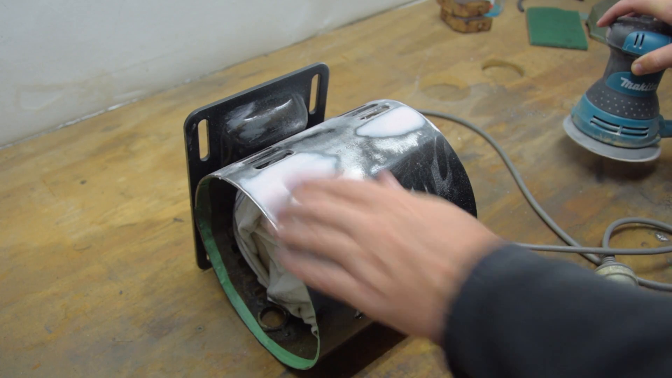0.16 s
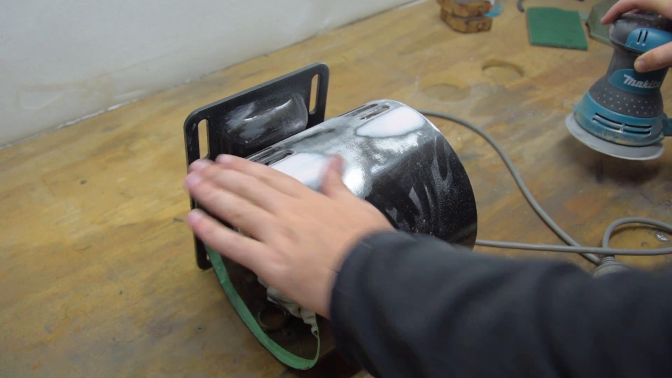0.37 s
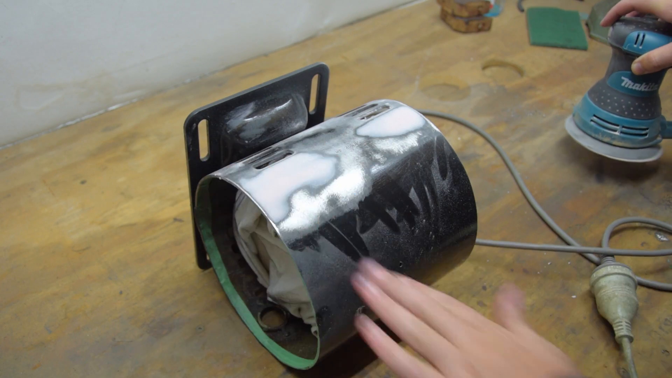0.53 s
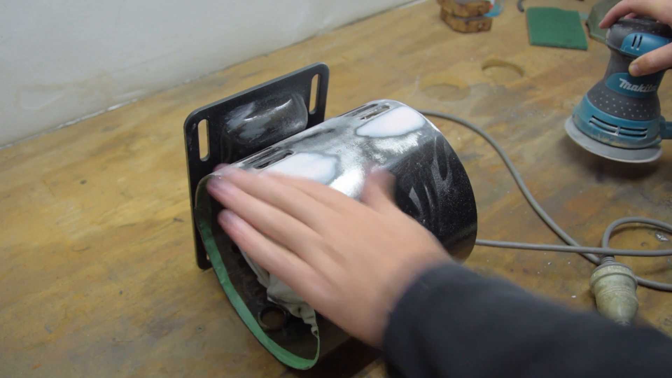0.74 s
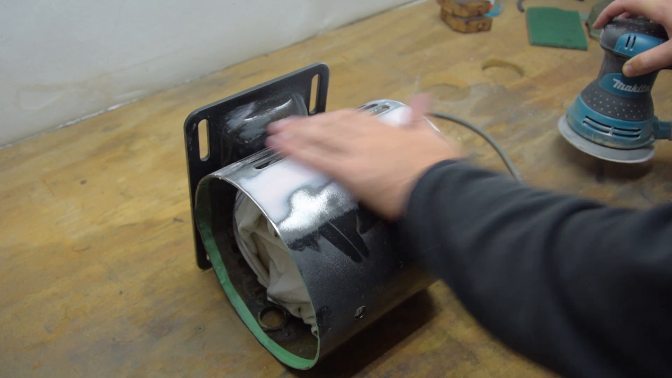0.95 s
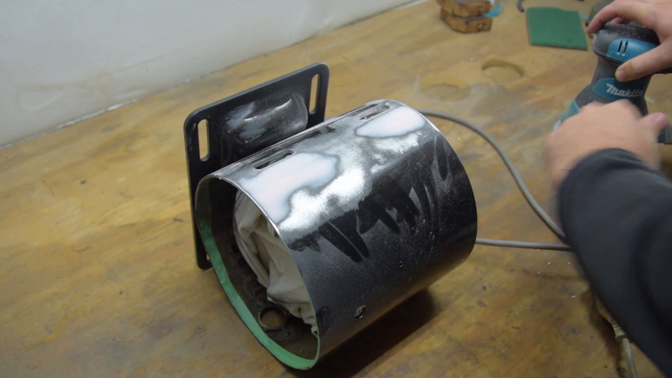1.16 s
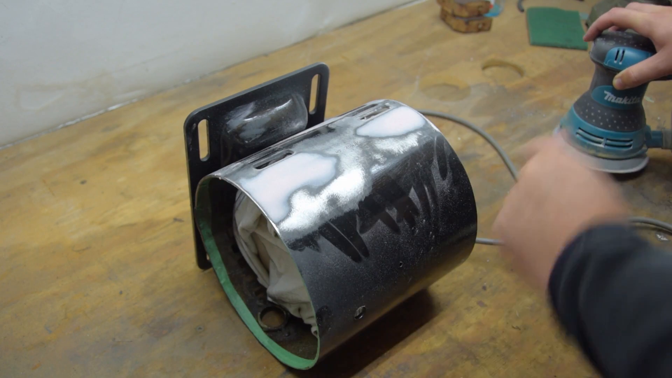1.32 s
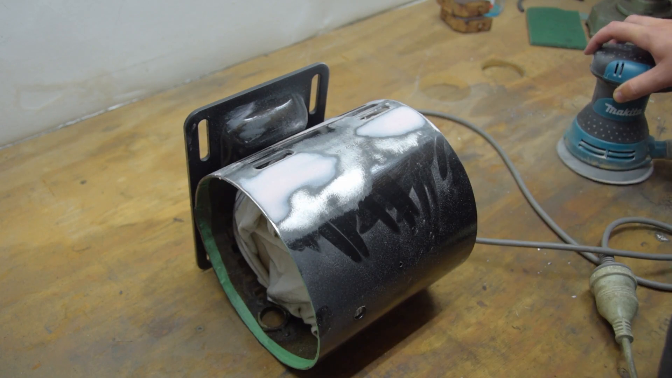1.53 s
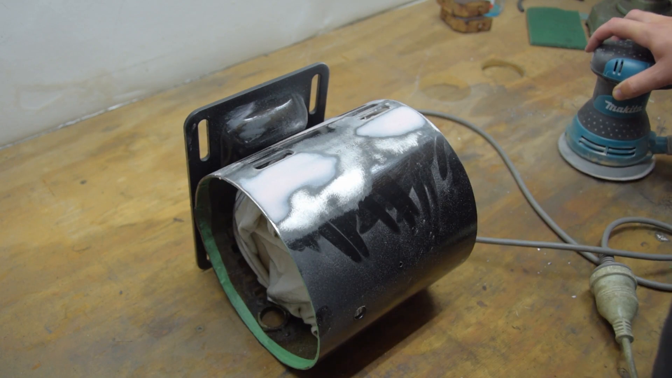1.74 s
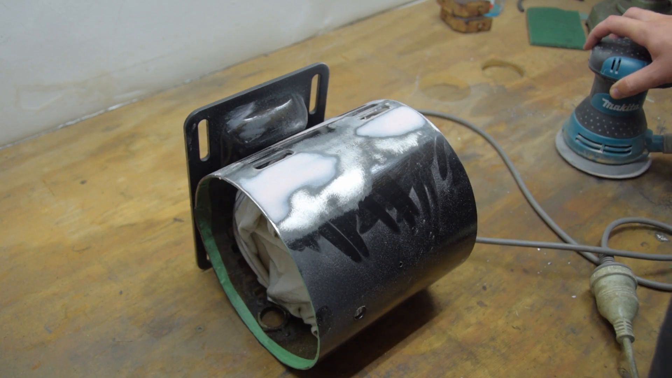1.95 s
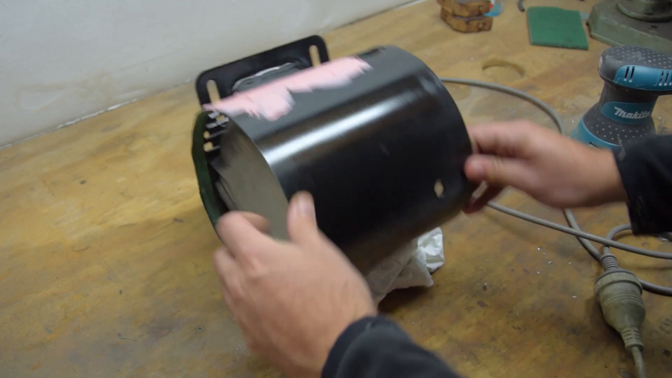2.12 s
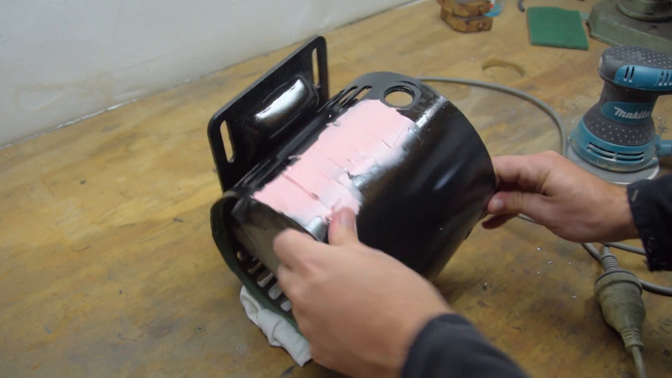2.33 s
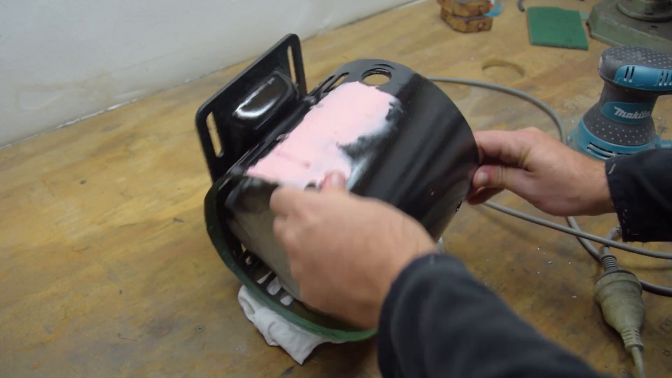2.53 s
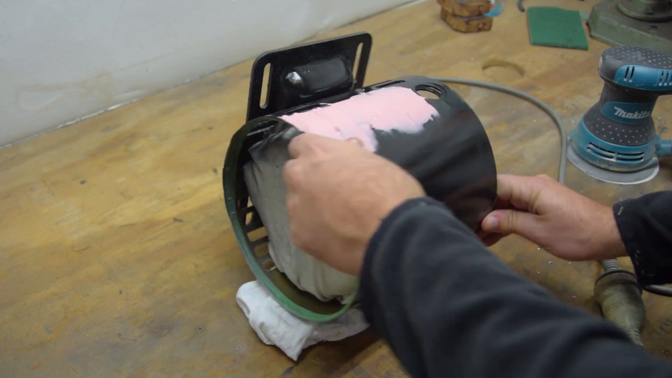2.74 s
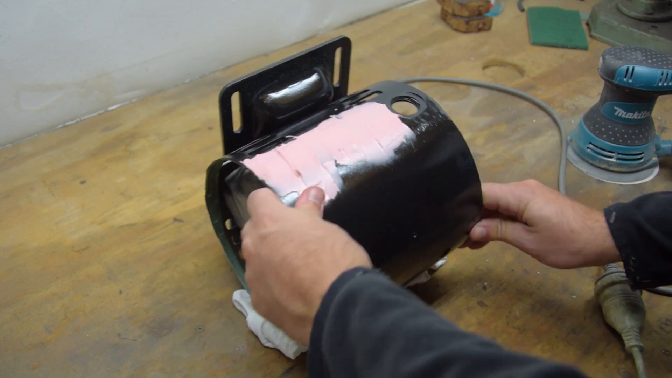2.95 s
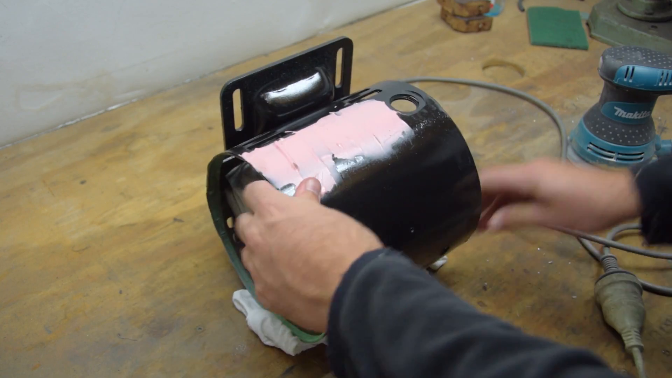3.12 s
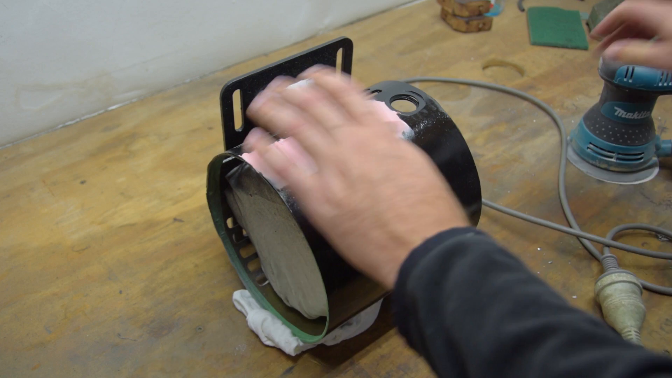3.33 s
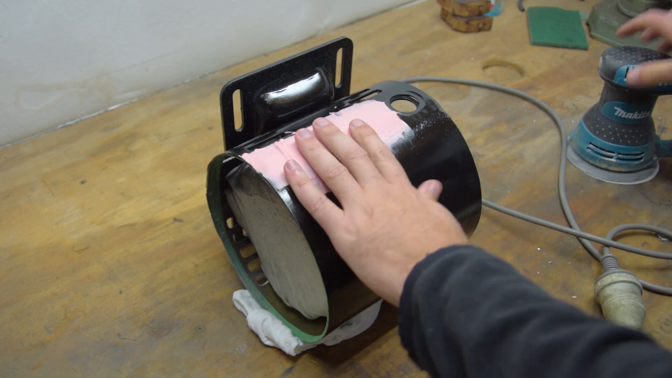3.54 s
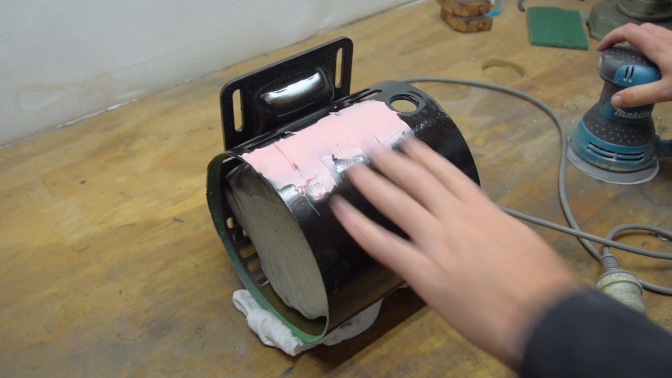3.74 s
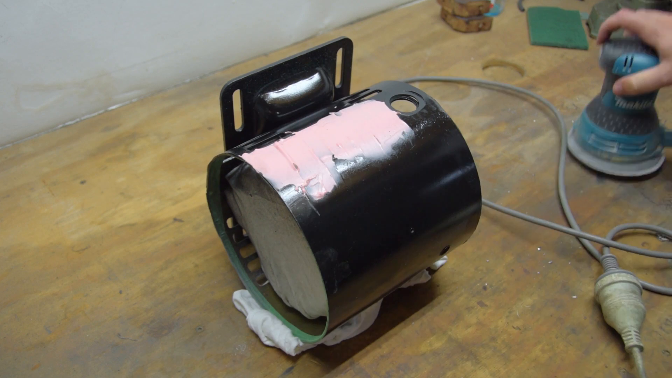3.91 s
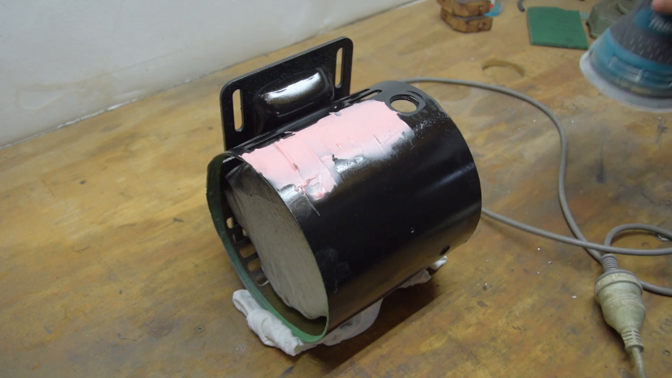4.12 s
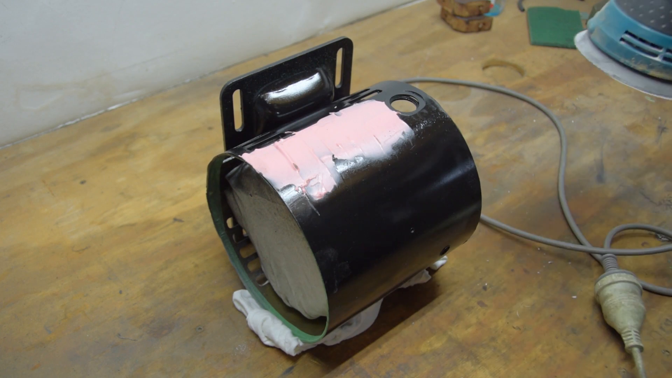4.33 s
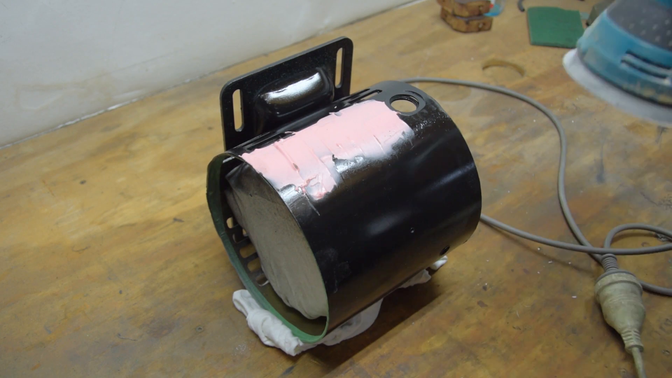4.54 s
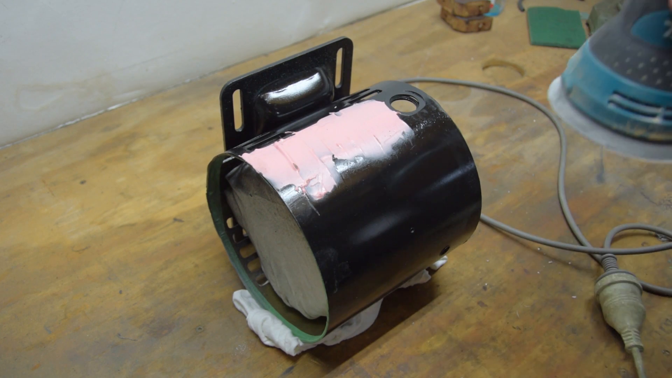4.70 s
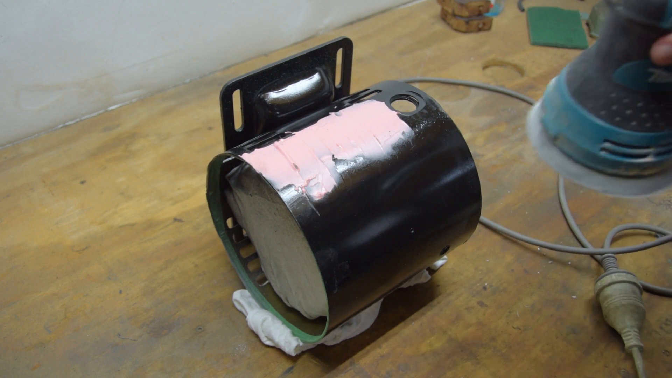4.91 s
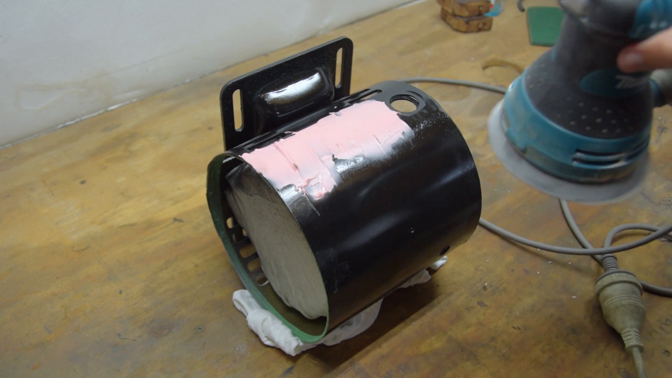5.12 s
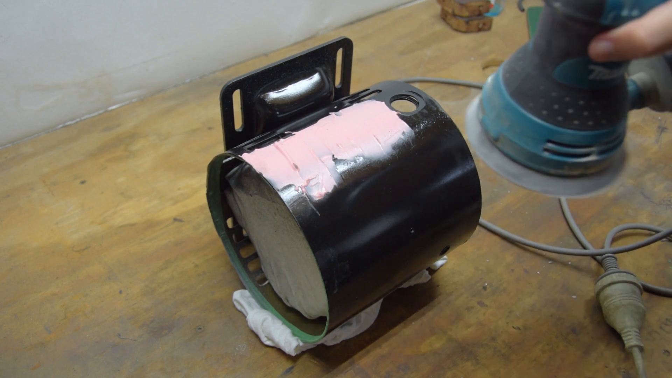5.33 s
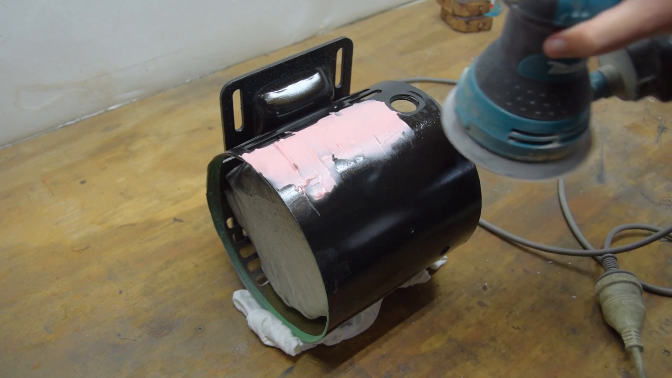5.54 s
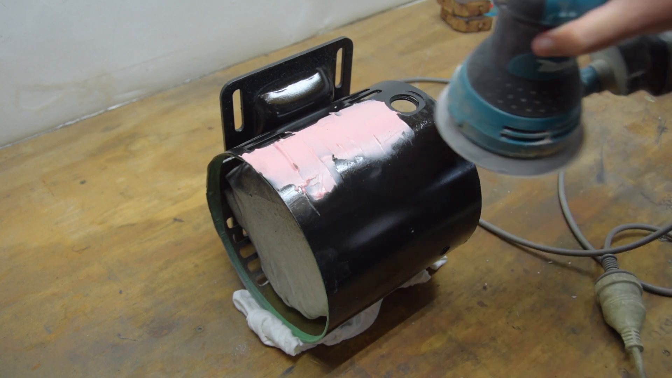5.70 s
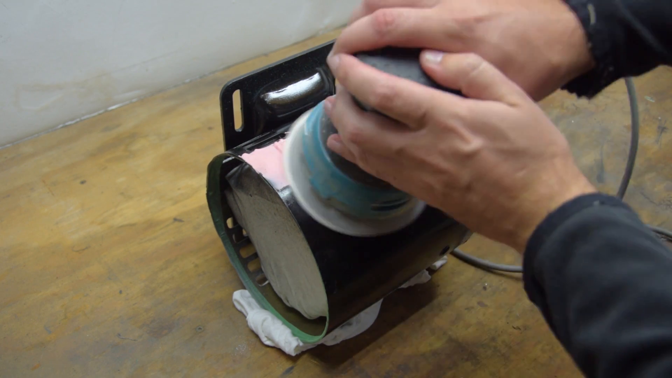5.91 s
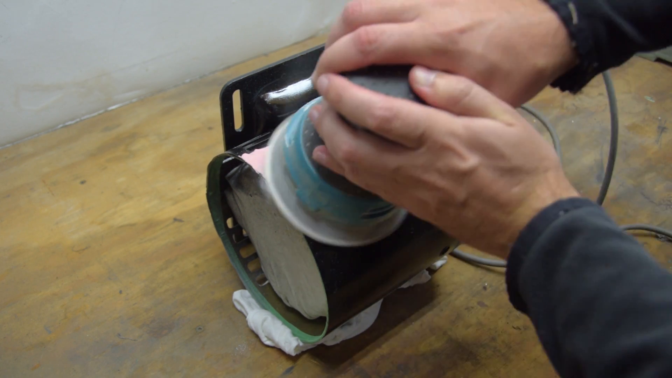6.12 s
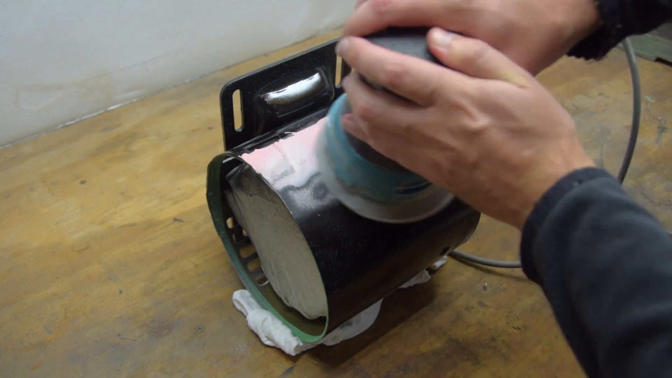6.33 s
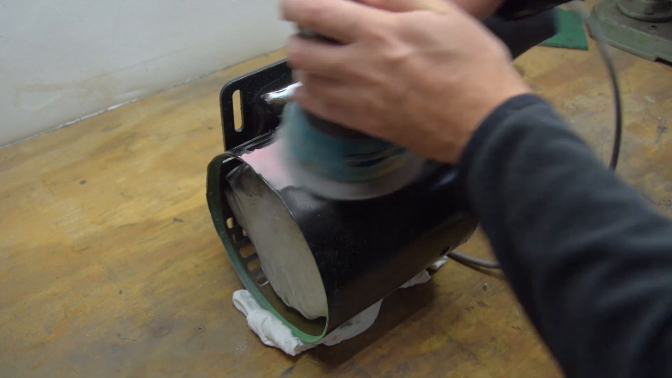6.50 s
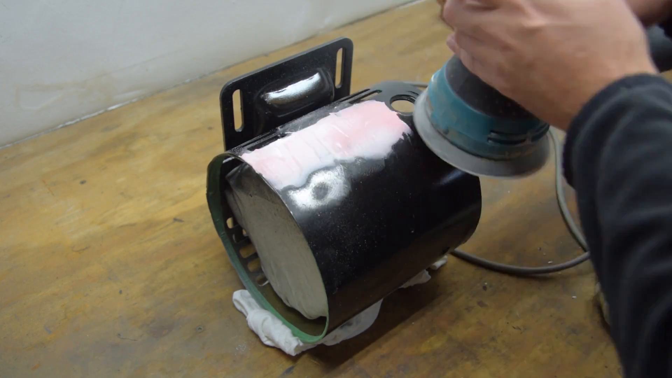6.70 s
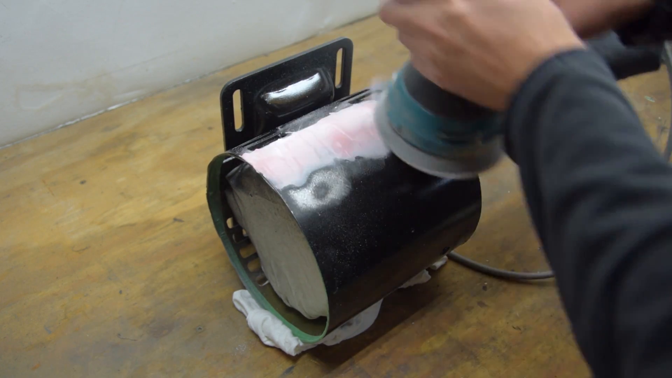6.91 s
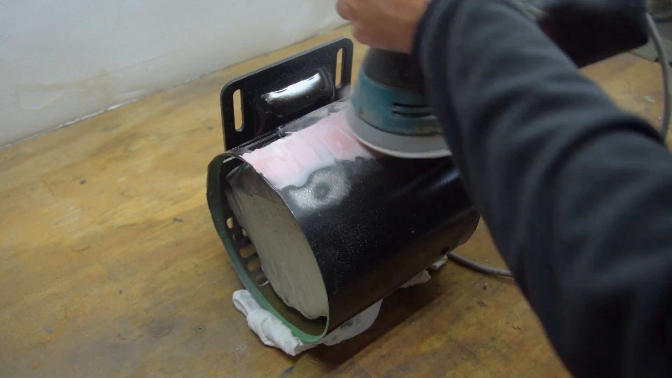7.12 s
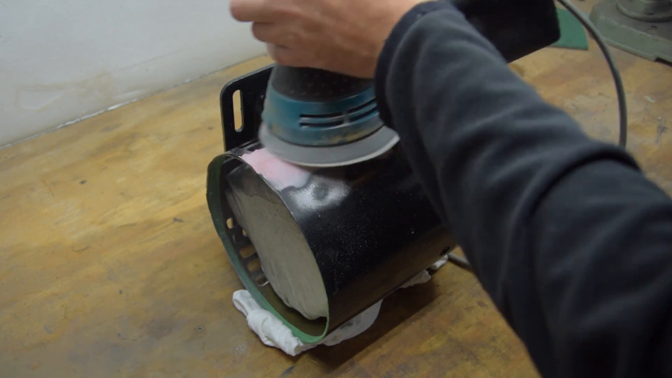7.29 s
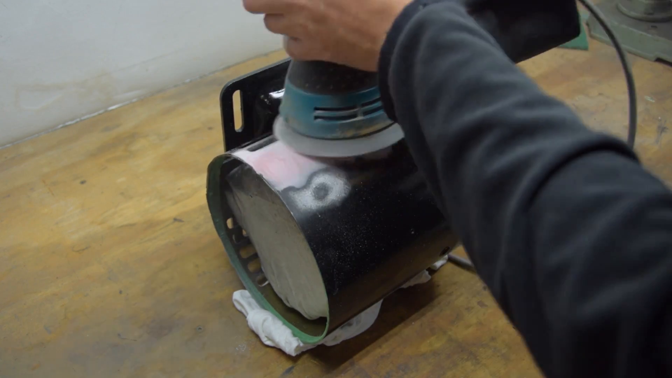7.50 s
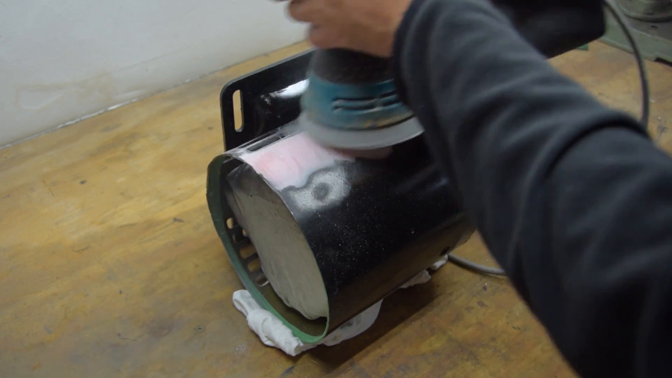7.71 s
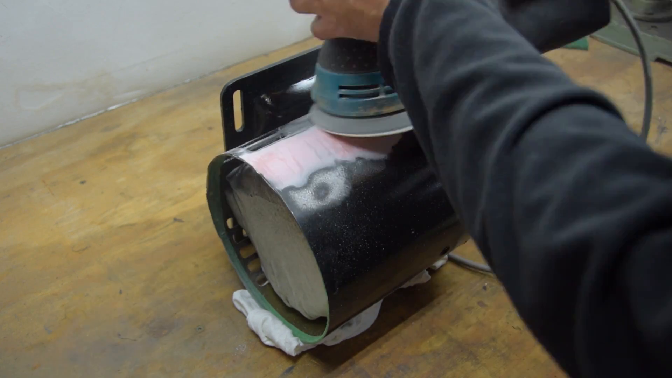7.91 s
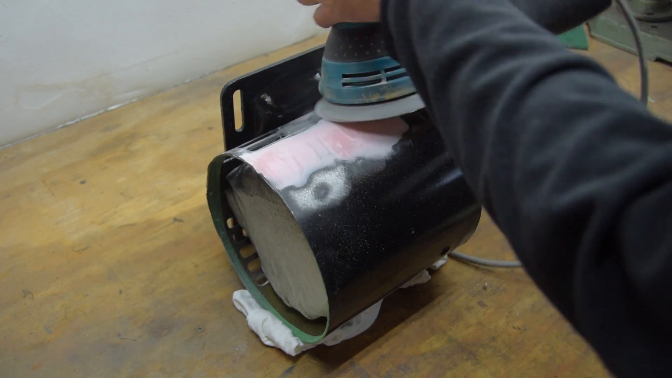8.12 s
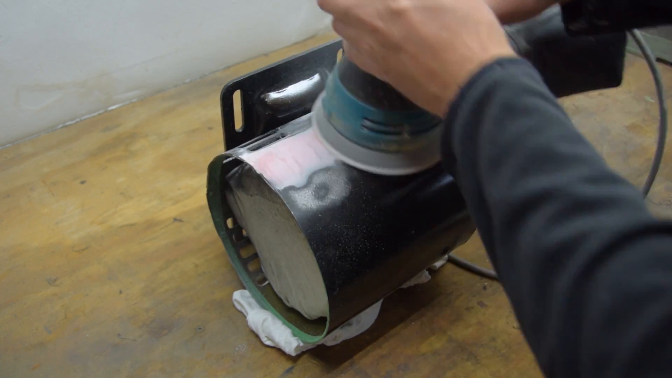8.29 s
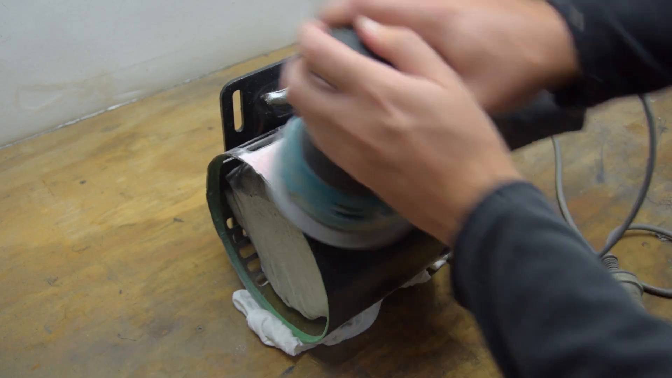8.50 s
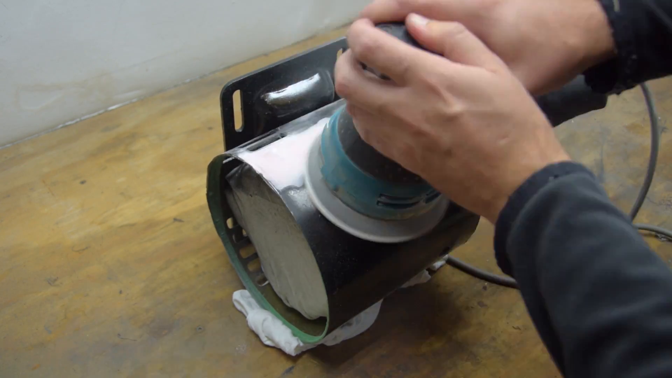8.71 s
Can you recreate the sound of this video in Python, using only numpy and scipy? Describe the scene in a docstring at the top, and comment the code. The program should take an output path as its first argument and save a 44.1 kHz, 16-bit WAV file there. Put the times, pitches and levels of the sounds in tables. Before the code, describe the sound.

From 0 to 2.2 s an orbital sander winds down close by: low thrum sliding from about 165 to 50 Hz, with a fading whine and airy rush. Soft hand wipes brush steel around 0.4, 1.1, 1.6 and 2.15 s. The motor sound ends abruptly. A steel housing then thuds on a wooden bench at about 2.37, 2.46, 2.66, 2.94 and 3.13 s, the 2.66 knock strongest, with hollow short rings, faint ticks and a light rim scrape. Quiet room tone with tiny taps and rubbing follows. A sharp plastic clack comes at 4.07 s. At 4.84 s a switch ticks and the motor rises quickly to a bright whir near 200 turns per second. Two dry clicks near 5.8 s mark pad contact; thereafter steady, loud sanding continues to the end, buzzing and hissing with wavering pitch, whine surges, brief rasps near 6.8 and 7.25 s, and a rapid fluttering echo.

```python
"""Sander and steel housing at a workshop bench

Close by in a small workshop, direct sound over room: an orbital sander coasts down while a hand wipes dust
off a sheet-steel housing on a wooden bench. The housing is rocked and set down, and the sander clacks as it
is picked up, spins up and sands filler. Shaft-locked sines make the pad's thrum, the casing's buzz and the
fan's whine; coloured noise makes air, grit and wiping; struck modes make the housing ring."""
import sys
import numpy as np
from scipy import signal
from scipy.fft import rfft, irfft, next_fast_len
from scipy.io import wavfile

SR = 44100
rng = np.random.default_rng(int(sys.argv[2]) if len(sys.argv) > 2 else 0)


def log_audio(samples):
    """Write samples as a 16-bit WAV file to the path given in sys.argv[1]."""
    # one column per channel
    frames = np.atleast_2d(samples).T
    # limit to full scale, then quantise
    limited = np.clip(frames, -1, 1)
    pcm = np.round(limited * 32767).astype(np.int16)
    wavfile.write(sys.argv[1], SR, pcm)


N = 385875
TIME = np.arange(N) / SR

# --- shaft of the sander ---
# the coasting sound ends abruptly; later the motor is switched on again
COAST_END_S, SWITCH_ON_S = 2.19, 4.84
# switched off, the shaft is slowed by air drag (time constant) and by steady friction
COAST_FROM_HZ, DRAG_S, FRICTION_HZ_PER_S = 165.7, 2.258, 17.3
# switched on, it closes in on its free speed until the pad touches the filler
SPIN_UP_FROM_S, FREE_HZ, SPIN_UP_S, TOUCH_S = 4.8115, 214.0, 0.3266, 5.78
# usual shaft speed while sanding
WORKING_HZ = 200
# shaft speed under the hand's changing load: (time [s], speed [turns/s])
SANDING_SPEED = [(5.77, 202.6), (5.83, 207.6), (5.93, 203.8), (6.07, 202.3), (6.26, 203.8), (6.34, 207.2),
                 (6.68, 200.4), (6.745, 200.4), (6.785, 209), (6.83, 209.2), (6.885, 201.5), (6.93, 199),
                 (6.98, 201.6), (7.06, 198.3), (7.14, 196.8), (7.2, 199.5), (7.265, 207), (7.325, 199.3),
                 (7.37, 196.9), (7.5, 197.8), (7.64, 199.6), (7.73, 203), (7.82, 204.1), (7.89, 199.3),
                 (7.97, 201), (8.17, 207.2), (8.27, 207.6), (8.32, 200.5), (8.45, 194.8), (8.58, 199.1),
                 (8.75, 199.5)]
# trembling of the shaft speed, as a share of it, which frays the high tones; under power more while slow
TREMBLE, DRIVEN_TREMBLE = 0.004, 0.004
# the thrum's phase jumps back abruptly: its time and the jump in turns
JUMP_S, JUMP_TURNS = 5.7735, 0.6
# the level dips briefly there: depth and time constant of the recovery
DIP_DB, DIP_S = 8, 0.0085

# --- layers of the sander: base level at working speed [dB], change per doubling of speed [dB] ---
THRUM_DB, THRUM_PER_OCTAVE_DB = -42, 21.5
BUZZ_DB, BUZZ_PER_OCTAVE_DB = -54, 9
FAN_HISS_DB, FAN_HISS_PER_OCTAVE_DB = -55, 11
# air builds more steeply under power than it fades when coasting
AIR_DB, AIR_PER_OCTAVE_DB, DRIVEN_AIR_PER_OCTAVE_DB = -39, 8.5, 10.5
# whine fades with the coasting shaft, but under power it weakens as the speed grows
WHINE_DB, WHINE_PER_OCTAVE_DB, DRIVEN_WHINE_PER_OCTAVE_DB = -52.5, 5.5, -4.5
# the thrum is louder while the sander coasts, hovering just over the bench
NEAR_BENCH_DB = 8.5
# standing waves swallow the thrum at some pitches:
# (pitch [Hz], width [Hz], loss by the bench [dB], loss when lifted [dB])
NODES = [(114, 7, 8, 2), (141, 7, 13, 11), (163, 9, 5, 11), (183, 10, 0, 7)]
# how firmly the pad couples to the housing; the first value holds before: (time [s], gain [dB])
PRESSURE = [(5.77, 3.5), (5.83, 6.5), (6.05, 6), (6.28, 4), (6.7, 9), (7.4, 9.5), (7.95, 8.5), (8.3, 9),
            (8.74, 9)]
# buzz gained and air choked off, in dB for each dB of pressure
BUZZ_FOLLOWS, AIR_CHOKES = 0.15, 0.31
# hum at twice the shaft speed: (time [s], level [dB])
SECOND_HUM = [(0, -57), (.6, -63.5), (2.19, -85.5), (4.9, -98), (5.15, -56.5), (5.33, -66), (5.47, -58),
              (5.85, -52), (6.2, -63), (6.4, -52), (6.55, -59.5), (7.05, -52.5), (7.5, -48), (7.78, -57.5),
              (7.92, -55), (8.23, -65), (8.35, -49.5), (8.75, -51)]
# hum at three times the shaft speed: (time [s], level [dB])
THIRD_HUM = [(0, -50), (.6, -66), (2.19, -75), (4.9, -73.5), (5.27, -58), (5.6, -60), (5.9, -58.5),
             (6.35, -69), (6.55, -58.5), (6.92, -52.5), (7.35, -57.5), (7.55, -54), (8.15, -51.5),
             (8.75, -51)]
# the casing's buzz: (multiple of the shaft speed, relative level [dB])
BUZZ = [(4, -10), (6, -9.5), (7, -9.5), (12, -12.5), (17, -11), (20, -22), (30, -46), (35, -16)]
# colour of the rushing air: (frequency [Hz], level [dB])
AIR = [(40, -38), (150, -13), (300, -10), (800, -4), (1100, 0), (1500, -0.5), (1900, 0.5), (2600, 3.5),
       (3400, 5), (4000, -3.5), (5500, -4.5), (7500, -10), (10000, -17.5), (15000, -51)]
# colour of the grit and the fan's hiss: (frequency [Hz], level [dB])
GRIT = [(100, -1), (330, 10.5), (1000, 3), (3000, 4), (4500, 9.5), (6000, -6), (7300, 6.5), (8500, 6.5),
        (10000, 6.5), (12500, 5.5), (15500, -0.5)]
# grit on the filler: its level, and the time it takes to bite
GRIT_DB, GRIT_BITE_S = -53, 0.13
# the paper loses its grip: (time [s], length [s], loss [dB])
SKIPS = [(6.753, 0.052, 22)]
# a narrow ring of the casing, stirred by noise and by any buzz that meets its pitch; build time at switch-on
SING_HZ, SING_T60_S, SING_DB, SING_BUZZ_DB, SING_BUILD_S = 1790, 0.28, -65, -5, 0.14
# the ring comes forward: (time [s], length [s], gain [dB])
SING_SWELLS = [(7.52, 0.34, 10)]

# --- whine ---
# counts of fan blades and armature slots
BLADES, SLOTS = 18, 12
# tone of the fan blades, then the 2nd to 11th multiple of the armature slots:
# (coasting level [dB], driven level [dB], clock time when fully in [s])
WHINE = [(-6, -4, 5.22), (7, 3.5, 5.08), (-4, -17, 4.3), (-4.5, -4, 5.14), (-7, -19, 5.2), (-5.5, -27, 4.6),
         (-8.5, -27, 5.9), (-7, -38, 6.1), (-12, -46, 5.2), (-11, -48, 5.2), (-19, -45, 5.2)]
# how fast each tone comes in as the motor picks up
WHINE_BUILD_DB_PER_S = 130
# slow wavering of each tone, and its fast flicker running free and under load
WHINE_WAVER_DB, FREE_FLICKER_DB, LOAD_FLICKER_DB = 3.0, 2.5, 3.6
# swing of the whine's amplitude once a turn, as a share of it, which gives it sidebands
WHINE_SWING = 0.42
# pass band of the vents: (frequency [Hz], level [dB])
VENTS = [(400, -39), (1250, -20), (1600, -8.5), (1850, -16), (2250, 1), (3000, 1), (4000, 0.5),
         (4900, -2.5), (5600, -4.5), (6600, -6.5), (7400, -4.5), (8400, -9), (10000, -14), (12000, -16),
         (14000, -21), (15500, -25)]
# the vents turn to face the listener or away; slot tones only: (time [s], length [s], gain [dB])
WHINE_SWELLS = [(5.17, 0.2, 2), (5.6, .16, 4), (5.87, .08, 5), (6.05, 0.25, 7), (6.23, .06, -7),
                (6.69, 0.1, 12), (6.83, .06, 4), (6.95, .07, -3), (7.07, .06, 4), (7.27, 0.07, 5.5),
                (7.5, .08, 3.5), (7.6, 0.08, -5), (7.82, 0.09, 6), (7.97, .06, 4), (8.37, .07, -6),
                (8.53, .05, -5)]
# single tones stand out or sink: (time [s], length [s], multiple of the shaft speed, gain [dB])
TONE_SWELLS = [(.36, .12, 48, 5), (.68, .36, 48, 8), (1.2, .18, 48, 5), (1.87, .3, 48, 5),
               (1.36, .22, 36, 4), (1.75, .16, 60, 4), (.51, .1, 60, 5), (1.02, .24, 60, 7),
               (1.38, .14, 60, 3), (2.02, .2, 60, 4), (.57, .14, 72, 5), (1.39, .14, 72, 4),
               (2.08, .25, 72, 4), (1.46, .16, 96, 4), (1.72, .22, 108, 13), (1.2, .16, 24, -6),
               (.2, .5, 84, -7), (.1, .3, 72, -7), (.1, .3, 60, -5), (.15, .2, 48, -4), (5.42, .3, 18, 5),
               (5.85, .08, 18, 9), (6.25, .4, 18, 10), (6.8, .07, 18, 10), (7.62, .25, 18, -12)]

# --- hands, housing and bench ---
# hands and sleeves brushing: (time [s], length [s], palm rumble [dB], skin swish [dB])
WIPES = [(0.393, .06, -58, -61.5), (1.109, 0.023, -70, -48.5), (1.612, 0.14, -57.5, -56.5),
         (2.164, 0.031, -60, -55.5), (2.312, 0.62, -73, -77.5), (3.69, 0.99, -75, -81),
         (3.907, 0.12, -70.5, -77.5)]
# colour of a palm rubbing the housing: (frequency [Hz], level [dB])
PALM = [(50, -7), (130, -8.5), (300, -9.5), (700, -16), (2000, -27.5), (8000, -48.5)]
# colour of skin sliding on dust: (frequency [Hz], level [dB])
SKIN = [(800, -1.5), (3000, 9.5), (8000, -1), (15000, -4)]
# bumps on the bench: (time [s], thud [dB], thud pitch [Hz], push on the modes [dB],
# contact cut-off [Hz], crack [dB])
BUMPS = [(2.367, -23, 86.7, -30.5, 160, -56.5), (2.46, -15.5, 110, -29, 353, -30),
         (2.6567, -12, 135, -16.5, 1050, -18.5), (2.9447, -15.5, 126, -14, 1570, -17),
         (3.128, -21, 121, -29, 690, -27.5), (3.481, -48, 109, -58.5, 1173, -52),
         (3.642, -66, 118, -58.5, 393, -71), (4.067, -36.5, 122, -59, 491, -73.5)]
# modes of housing and bench top: (pitch [Hz], relative level [dB], t60 [s])
HOUSING = [(66.4, -3, 0.24), (85, -4, 0.33), (107, -8, 0.85), (119.4, -14.5, 0.38), (156.4, 2.5, 0.26),
           (214, -22.5, 0.47), (269.5, 5.5, 0.076), (285, -0.5, 0.14), (371, -18.5, 0.18),
           (419, -14.5, 0.23), (490, -2.5, 0.079), (553, -16.5, 0.31), (700, -11.5, 0.11),
           (765, -18.5, 0.067), (915, -24.5, 0.25), (1033, -19.5, .17), (1215, -22, .22),
           (1260, -10.5, 0.057), (1534, -32, 0.15), (1750, -27.5, .22), (2019, -35.5, .3), (2820, -32, .25),
           (3200, -34.5, .35), (3450, -32.5, .25)]
# colour of the steel rim hitting the bench: (frequency [Hz], level [dB])
CRACK = [(30, -14.5), (80, -2), (200, 17.5), (330, 9.5), (480, 2.5), (800, -1.5), (1200, -7), (2000, -12),
         (3100, -8), (4200, -21.5), (6000, -25.5), (15000, -28)]
# fingers tap the housing and wake one mode: (time [s], pitch [Hz], level [dB], t60 [s])
TAPS = [(2.324, 1260, -60, 0.035), (3.323, 915, -61, 0.041), (3.48, 1050, -56, 0.063)]
# small ticks of fingers, rim and switch: (time [s], level [dB], t60 [s])
TICKS = [(2.372, -65, 0.037), (2.48, -63, .02), (2.688, -54, 0.058), (2.787, -63, 0.074),
         (3.192, -48.5, 0.0084), (3.323, -70, 0.016), (3.481, -60.5, 0.04), (3.604, -62, 0.033),
         (3.638, -64, 0.047), (4.835, -56.5, 0.03), (4.862, -61.5, 0.02)]
# colour of the ticks: (frequency [Hz], level [dB])
TICK = [(300, -6.5), (1000, -5.5), (3000, 5.5), (7000, -1.5), (11000, -4.5), (15500, -21)]
# the rim slides over the bench between two bumps: (time [s], length [s], level [dB])
SLIDES = [(3.073, 0.25, -66)]
# colour of the sliding rim: (frequency [Hz], level [dB])
RIM = [(500, 0.5), (2800, -9), (3600, -1), (4300, -18), (5800, -11), (7000, -18), (8000, -12),
       (15000, -26.5)]
# plastic clacks of the sander: (time [s], level [dB], t60 [s], contact cut-off [Hz])
CLACKS = [(4.025, -45, 0.028, 4500), (4.043, -50, .04, 2500), (4.0648, -41, 0.013, 3500),
          (4.0688, -24.5, 0.018, 14000), (4.078, -42, .06, 14000)]
# colour of the plastic body and pad knocking on the bench: (frequency [Hz], level [dB])
CLACK = [(50, -39), (110, 4), (330, 6.5), (750, -4.5), (1150, 3), (1800, 2), (2500, 4), (3150, 7.5),
         (4000, 0), (5500, -11.5), (7000, -16), (10000, -33), (15000, -42)]
# the plastic shell rings briefly: (pitch [Hz], level against the contact's click [dB], t60 [s])
SHELL = [(1193, -11, .02), (2586, -10, 0.008), (3000, -6, 0.024), (3300, -16, .009)]
# level of the room's answer to a clack
CLACK_ROOM_DB = -8.5

# --- dry clicks and the flutter ---
# dry clicks as the flutter sets in: (time [s], level before colour [dB], brightness [dB per octave])
POPS = [(5.7735, -13, 7), (5.8162, -6.5, 0)]
# colour of the dry clicks: (frequency [Hz], level [dB])
POP = [(100, -10), (800, -14), (1300, 7.5), (4000, 4.5), (7000, -4.5), (15000, -16)]
# pitch about which a click's brightness pivots
POP_PIVOT_HZ = 5000
# while sanding, the sound repeats in a fast fading flutter: start, repeat time, share of the whine repeated
FLUTTER_S, FLUTTER_LAG_S, WHINE_FLUTTER = 5.775, 0.042667, 0.24
# the pad skids and rasps: (time [s], length [s], level [dB])
RASPS = [(6.813, 0.09, -42), (7.26, 0.087, -47)]
# colour of the rasp: (frequency [Hz], level [dB])
RASP = [(200, -45), (1500, -18), (2700, -4), (3300, -3), (3800, -4), (4300, -12), (8000, -26)]

# --- place and microphone ---
# decay of the workshop: (frequency [Hz], t60 [s])
ROOM_T60 = [(60, .4), (250, 0.53), (1000, 0.53), (3000, 0.47), (6000, 0.37), (14000, 0.12)]
# colour of the quiet workshop: (frequency [Hz], level [dB])
QUIET = [(38, -31), (65, -3), (158, -4.5), (335, -3.5), (450, -8.5), (565, -2), (912, -19), (1610, -14),
         (2370, -18.5), (3500, -17), (4400, -22.5), (15000, -23)]
QUIET_DB = -78
# colour of the faint hiss, opposite in the two channels: (frequency [Hz], level [dB])
HISS = [(100, -2), (1000, -1), (5000, -1), (10000, 0.42), (15000, -2)]
HISS_DB = -90.5
# a faint steady electrical whistle at the very top
WHISTLE_HZ, WHISTLE_DB = 15633, -86.5
# full spread of the sander between left and right: (frequency [Hz], side against mid [dB])
WIDTH = [(100, -11), (200, -65), (400, -9.5), (600, -14.5), (1000, -13.5), (2200, -25), (4500, -17),
         (8000, -8), (13000, -4)]
# the spread opens slowly from the flutter's start: time to full width, starting width
WIDEN_S, NARROW_DB = 1.54, -21
# top of the microphone's range
CUTOFF_HZ = 15850


def from_db(db):
    """Decibels to gain."""
    return 10 ** (np.asarray(db) / 20)


def rms_one(x):
    """Scale to rms 1."""
    return x / np.sqrt(np.mean(x ** 2) + 1e-20)


def in_time(rows):
    """Each column of a curve, sample by sample."""
    s, *columns = np.transpose(rows)
    return np.array([np.interp(TIME, s, c) for c in columns])


def at_hz(points, hz):
    """Read a spectrum on a log-frequency axis."""
    f, value = np.transpose(points)
    return np.interp(np.log(hz + 1e-9), np.log(f), value)


def colour(x, spectrum):
    """Shape a signal by a spectrum."""
    gain = from_db(at_hz(spectrum, np.fft.rfftfreq(len(x), 1 / SR)))
    return irfft(rfft(x) * gain, len(x))


def noise(spectrum):
    """Coloured noise of rms 1."""
    white = rng.standard_normal(next_fast_len(N))
    return rms_one(colour(white, spectrum)[:N])


def drift(rate):
    """Smooth random wander, about 1 in spread, with a new target rate times a second."""
    return np.interp(TIME * np.clip(rate, 0, 400), np.arange(4000), rng.standard_normal(4000))


def swell(s, length):
    """A smooth rise and fall around s."""
    return np.exp(-(2 * (TIME - s) / length) ** 2)


def swells(table):
    """Sum of smooth rises and falls, in dB."""
    return sum(db * swell(s, length) for s, length, db in table)


def swell_gain(table):
    """Sum of smooth rises and falls out of silence, as gain."""
    return sum(from_db(db) * swell(s, length) for s, length, db in table)


def fade(s, t60):
    """An envelope that starts at s and dies away."""
    return (TIME >= s) * from_db(-60 * np.clip((TIME - s) / t60, 0, 4))


def fade_energy(t60):
    """Energy of a fade from height 1, in samples."""
    return t60 * SR / (2 * np.log(1000))


def click(s, db):
    """One sample of the given height at time s."""
    return from_db(db) * signal.unit_impulse(N, int(s * SR))


def ring(force, hz, t60):
    """A mode: a unit click sets a sine of height 1 ringing."""
    r, w = from_db(-60 / (t60 * SR)), 2 * np.pi * hz / SR
    return signal.lfilter([0, np.sin(w)], [1, -2 * r * np.cos(w), r * r], force + 1e-18)


def soften(x, hz):
    """A soft contact loses the treble above hz."""
    return signal.sosfilt(signal.butter(2, min(hz, CUTOFF_HZ), fs=SR, output="sos"), x + 1e-18)


def workshop(x, gap_s=0.011):
    """Diffuse echoes of unit energy after a short gap; the top treble dies first."""
    t, tail = TIME[:SR], 0
    edges = np.geomspace(40, 17000, 10)
    for low, high in zip(edges, edges[1:]):
        band_filter = signal.butter(2, [low, high], "band", fs=SR, output="sos")
        band = signal.sosfilt(band_filter, rng.standard_normal(SR))
        t60 = at_hz(ROOM_T60, np.sqrt(low * high))
        tail = tail + band * 1000 ** (-t / t60) * (t > gap_s)
    return signal.fftconvolve(x, tail / np.linalg.norm(tail))[:N]


def shaft_speed():
    """Turns per second: coasting down under drag and friction, spinning up, then under load."""
    drag_offset = FRICTION_HZ_PER_S * DRAG_S
    coast = (COAST_FROM_HZ + drag_offset) * np.exp(-TIME / DRAG_S) - drag_offset
    since_start = np.maximum(TIME, SWITCH_ON_S) - SPIN_UP_FROM_S
    spin_up = FREE_HZ * (1 - np.exp(-since_start / SPIN_UP_S))
    return np.select([TIME < COAST_END_S, TIME < TOUCH_S], [coast, spin_up], in_time(SANDING_SPEED)[0])


def sander_levels(speed, coasting):
    """Levels in dB of thrum, buzz, whine, air and fan hiss, from shaft speed and pad pressure."""
    octaves = np.log2(speed / WORKING_HZ)
    pressure_db, = in_time(PRESSURE)
    nodes_db = sum(np.where(coasting, bench_db, lifted_db) * np.exp(-((speed - hz) / width) ** 2)
                   for hz, width, bench_db, lifted_db in NODES)
    thrum_db = THRUM_DB + THRUM_PER_OCTAVE_DB * octaves + NEAR_BENCH_DB * coasting - nodes_db + pressure_db
    buzz_db = BUZZ_DB + BUZZ_PER_OCTAVE_DB * octaves + BUZZ_FOLLOWS * pressure_db
    whine_db = WHINE_DB + np.where(coasting, WHINE_PER_OCTAVE_DB, DRIVEN_WHINE_PER_OCTAVE_DB) * octaves
    air_slope_db = np.where(coasting, AIR_PER_OCTAVE_DB, DRIVEN_AIR_PER_OCTAVE_DB)
    air_db = AIR_DB + air_slope_db * octaves - AIR_CHOKES * pressure_db
    hiss_db = FAN_HISS_DB + FAN_HISS_PER_OCTAVE_DB * octaves
    return thrum_db, buzz_db, whine_db, air_db, hiss_db


def partial(angle, multiple, waver_db):
    """A wavering tone of rms about 1, locked to the shaft."""
    phase = 2 * np.pi * rng.random()
    return from_db(waver_db * drift(25)) * np.sqrt(2) * np.sin(multiple * angle + phase)


def casing_buzz(angle):
    """The imbalance shakes the casing on every multiple of the turn from the 4th to the 35th."""
    return sum(from_db(at_hz(BUZZ, k)) * partial(angle, k, waver_db=4.5) for k in range(4, 36))


def whine(angle, speed, coasting):
    """Blade and slot tones glide through the vents' pass band and swing with each turn."""
    multiples = [BLADES] + [SLOTS * k for k in range(2, len(WHINE) + 1)]
    slots_db, tones = swells(WHINE_SWELLS), 0
    for k, (coast_db, driven_db, full_s) in zip(multiples, WHINE):
        own_db = swells([(s, length, db) for s, length, multiple, db in TONE_SWELLS if multiple == k])
        build_db = WHINE_BUILD_DB_PER_S * np.minimum(TIME - full_s, 0)
        flicker_db = np.where(TIME > TOUCH_S, LOAD_FLICKER_DB, FREE_FLICKER_DB) * drift(65)
        db = np.where(coasting, coast_db, driven_db + build_db) + flicker_db + own_db
        db = db + slots_db * (k != BLADES) + at_hz(VENTS, k * speed)
        audible = k * speed < CUTOFF_HZ
        tones = tones + from_db(db) * audible * partial(angle, k, waver_db=WHINE_WAVER_DB)
    return tones * (1 + WHINE_SWING * np.sin(angle) + 0.13 * np.sin(2 * angle))


def casing_ring(buzz, coasting):
    """A narrow resonance of the casing, driven by noise and by the buzz."""
    by_noise = rms_one(ring(rng.standard_normal(N), SING_HZ, SING_T60_S))
    # divided by the mode's gain for a steady tone at its pitch
    by_buzz = ring(buzz, SING_HZ, SING_T60_S) / fade_energy(SING_T60_S)
    sing = from_db(SING_DB) * by_noise + from_db(SING_BUZZ_DB) * by_buzz
    stirred = np.where(coasting, 1, np.clip((TIME - SWITCH_ON_S) / SING_BUILD_S, 0, 1))
    return from_db(swells(SING_SWELLS)) * stirred * sing


def rushing_air(angle, air_db):
    """Turbulent air, pulsing faintly once a turn and fluctuating at random."""
    return from_db(air_db + 0.092 * np.sin(angle) + 1.24 * drift(60)) * noise(AIR)


def grit_and_fan_hiss(angle, hiss_db):
    """Grains catch at random, hardest on one side of the orbit, over the hiss of the fan."""
    bite = np.clip((TIME - TOUCH_S) / GRIT_BITE_S, 0, 1) * from_db(GRIT_DB - swells(SKIPS))
    level = np.hypot(bite, from_db(hiss_db))
    return level * from_db(0.59 * np.sin(angle) + 2.3 * drift(300)) * noise(GRIT)


def sander():
    """Every tone follows the shaft; air and grit pulse once an orbit."""
    coasting, speed = TIME < COAST_END_S, shaft_speed()
    thrum_db, buzz_db, whine_db, air_db, hiss_db = sander_levels(speed, coasting)
    tremble = np.where(coasting, TREMBLE, DRIVEN_TREMBLE * np.sqrt(WORKING_HZ / speed)) * drift(120)
    angle = 2 * np.pi * np.cumsum(speed * (1 + tremble)) / SR
    # the eccentric pad pushes air once a turn, nearly a pure tone
    thrum_angle = angle - 2 * np.pi * JUMP_TURNS * (TIME > JUMP_S)
    thrum = from_db(thrum_db) * partial(thrum_angle, 1, waver_db=0.8)
    second = from_db(in_time(SECOND_HUM)[0]) * partial(angle, 2, waver_db=5.0)
    third = from_db(in_time(THIRD_HUM)[0]) * partial(angle, 3, waver_db=4.0)
    buzz = from_db(buzz_db) * casing_buzz(angle)
    fan_whine = from_db(whine_db) * whine(angle, speed, coasting)
    tones = buzz + fan_whine
    dip = from_db(-DIP_DB * (TIME > JUMP_S) * np.exp(-np.abs(TIME - JUMP_S) / DIP_S))
    noises = rushing_air(angle, air_db) + grit_and_fan_hiss(angle, hiss_db) + rasps(angle)
    room = from_db(-9.5) * workshop(tones)
    machine = dip * (noises + casing_ring(buzz, coasting) + tones + room) + pops()
    repeats = flutter(machine - (1 - WHINE_FLUTTER) * dip * fan_whine)
    running = coasting | (TIME > SWITCH_ON_S)
    return running * (dip * thrum + second + third + machine + repeats)


def wipes():
    """Skin and cloth slide over dusty steel in soft swells of noise."""
    palm = swell_gain([(s, length, palm_db) for s, length, palm_db, _ in WIPES])
    skin = swell_gain([(s, length, skin_db) for s, length, _, skin_db in WIPES])
    return from_db(1.8 * drift(120)) * (palm * noise(PALM) + skin * noise(SKIN))


def bumps(thud_t60=0.16, rise_t60=0.016, crack_t60=0.049, crack_reach=2.3):
    """The bench thuds under each bump; a harder contact reaches higher modes and cracks more brightly."""
    thud, force, cracks = np.zeros((3, N))
    for s, thud_db, thud_hz, ring_db, contact_hz, crack_db in BUMPS:
        envelope = fade(s, thud_t60) - fade(s, rise_t60)
        thud -= from_db(thud_db) * envelope * np.sin(2 * np.pi * thud_hz * (TIME - s))
        force -= soften(click(s, ring_db), contact_hz)
        crack = snaps([(s, crack_db, crack_t60)], CRACK, room_db=-8.0, wall_hz=9000)
        cracks += soften(crack, crack_reach * contact_hz)
    # neighbouring modes swing in opposite directions
    modes = sum((-1) ** k * ring(force, hz, t60) * from_db(db - 4.5)
                for k, (hz, db, t60) in enumerate(HOUSING))
    return thud + modes + cracks + workshop(from_db(-12.5) * thud + from_db(-15.0) * modes)


def snaps(table, spectrum, room_db, wall_hz):
    """Short hard contacts on damped parts; the room answers each as it would a click of equal energy."""
    direct = sum(from_db(db) * fade(s, t60) for s, db, t60 in table) * noise(spectrum)
    clicks = sum(click(s, db) * np.sqrt(fade_energy(t60)) for s, db, t60 in table)
    unit = np.linalg.norm(colour(signal.unit_impulse(SR), spectrum))
    return direct + from_db(room_db) * workshop(soften(colour(clicks, spectrum), wall_hz) / unit)


def taps():
    """Light finger taps on the steel, each ringing one mode."""
    return sum(ring(click(s, db), hz, t60) for s, hz, db, t60 in TAPS)


def ticks():
    """Small dry ticks of fingers, rim and switch: short noise bursts with the room's answer."""
    return snaps(TICKS, TICK, room_db=-9.5, wall_hz=9000)


def slides():
    """The steel rim chatters as it is pushed along: noise of unsteady level."""
    return swell_gain(SLIDES) * from_db(2.0 * drift(200)) * noise(RIM)


def clacks():
    """The sander is picked up: each contact cracks and rings its plastic shell, and the room answers."""
    grain, crack, force, burst = noise(CLACK), 0, 0, 0
    for s, db, t60, contact_hz in CLACKS:
        contact = soften(click(s, db), contact_hz)
        crack = crack + soften(soften(from_db(db) * fade(s, t60) * grain, contact_hz), contact_hz)
        force = force + contact
        # the room hears a click with the energy of the crack
        burst = burst + soften(contact, contact_hz) * np.sqrt(fade_energy(t60))
    shell = sum(from_db(db) * ring(force, hz, t60) for hz, db, t60 in SHELL)
    unit = np.linalg.norm(colour(signal.unit_impulse(SR), CLACK))
    return crack + shell + from_db(CLACK_ROOM_DB) * workshop(colour(burst, CLACK) / unit, gap_s=0.0068)


def pops():
    """Two dry clicks, the first thin and bright."""
    total = 0
    for s, db, tilt in POPS:
        tilted = [(hz, level + tilt * np.log2(hz / POP_PIVOT_HZ)) for hz, level in POP]
        total = total + colour(click(s, db), tilted)
    return total


def flutter(x):
    """Repeats at a fixed lag, each weaker than the last; the bass takes no part."""
    first, fading = 0.36, 0.68  # gain of the first repeat, then from each to the next
    size = next_fast_len(N + SR)
    delay = np.exp(-2j * np.pi * np.fft.rfftfreq(size, 1 / SR) * FLUTTER_LAG_S)
    upper = signal.sosfilt(signal.butter(2, 600, "high", fs=SR, output="sos"), x * (TIME > FLUTTER_S))
    # closed form of the endless series of repeats
    return irfft(rfft(upper, size) * first * delay / (1 - fading * delay), size)[:N]


def rasps(angle):
    """The skidding pad scrapes in rough bursts, once an orbit."""
    return swell_gain(RASPS) * from_db(3 * np.sin(angle) + 2.8 * drift(140)) * noise(RASP)


def scene():
    """All sits in the centre; a faint hiss and, from the flutter on, the sander spread to the sides."""
    tool = sander()
    handling = wipes() + bumps() + taps() + ticks() + slides() + clacks()
    whistle = from_db(WHISTLE_DB) * np.sqrt(2) * np.sin(2 * np.pi * WHISTLE_HZ * TIME)
    mid = tool + handling + whistle + from_db(QUIET_DB) * noise(QUIET)
    # a short burst of noise smears the sander for the side signal
    scatter = rng.standard_normal(SR // 10) * fade(0, 0.2)[:SR // 10]
    smeared = signal.fftconvolve(tool, scatter / np.linalg.norm(scatter))[:N]
    narrowing_db = NARROW_DB * np.clip(1 - (TIME - FLUTTER_S) / WIDEN_S, 0, 1)
    opening = from_db(narrowing_db) * (TIME > FLUTTER_S)
    side = colour(smeared, WIDTH) * opening + from_db(HISS_DB) * noise(HISS)
    return np.array([mid + side, mid - side])


def record(dry):
    """The microphone sheds the deepest bass; the top is cut steeply."""
    lean = signal.sosfilt(signal.butter(4, 42, "high", fs=SR, output="sos"), dry)
    return signal.sosfilt(signal.ellip(12, 0.1, 80, CUTOFF_HZ, fs=SR, output="sos"), lean)


dry = scene()
out = record(dry)
log_audio(out)
```